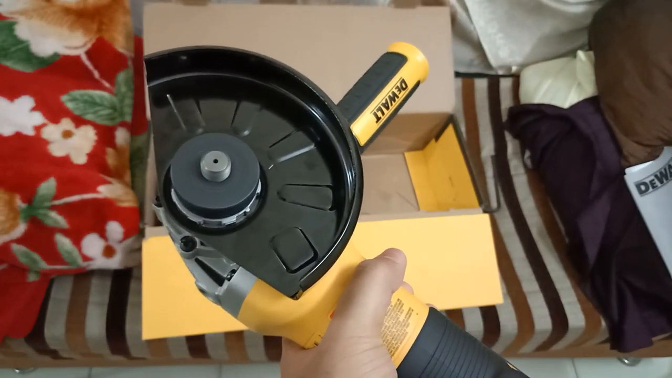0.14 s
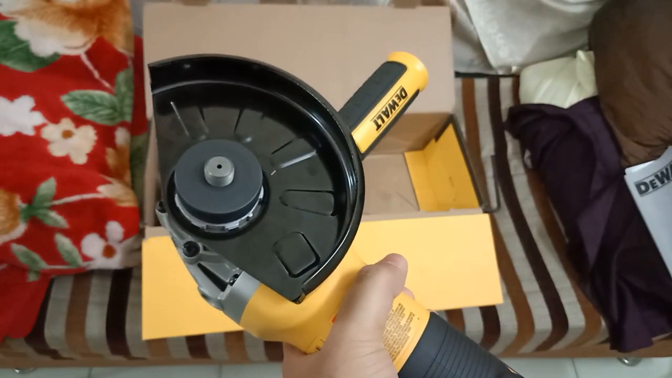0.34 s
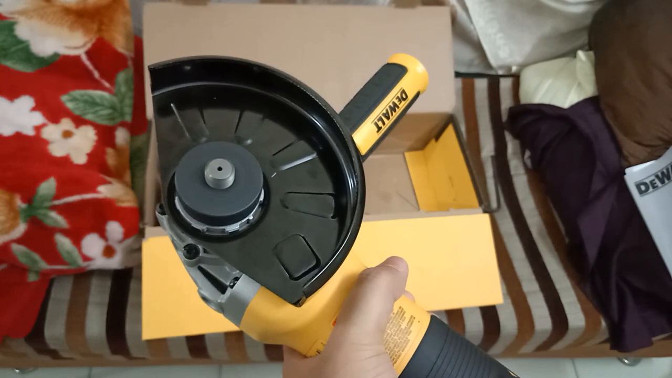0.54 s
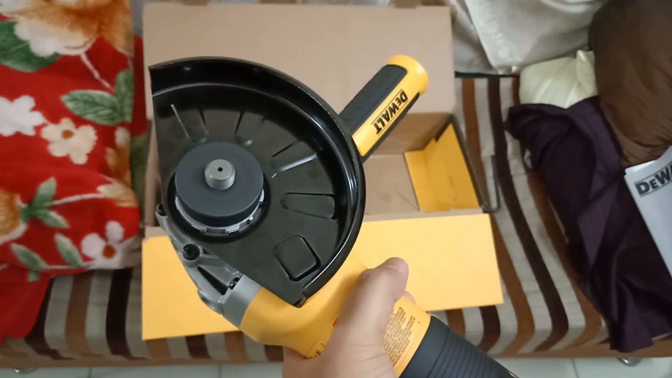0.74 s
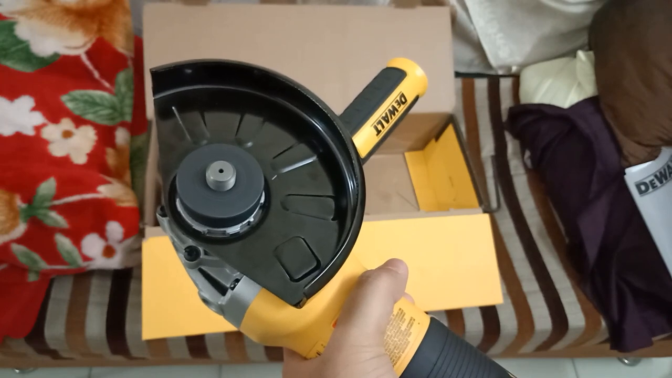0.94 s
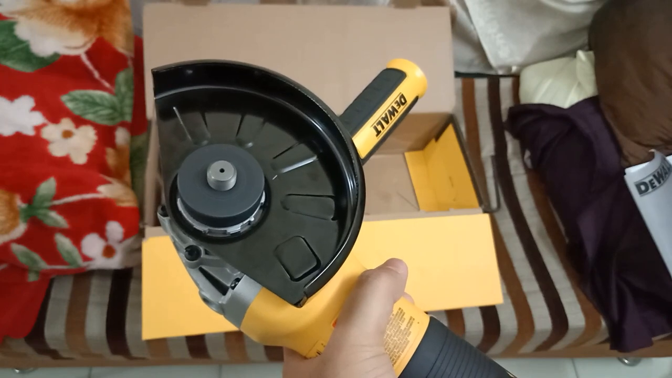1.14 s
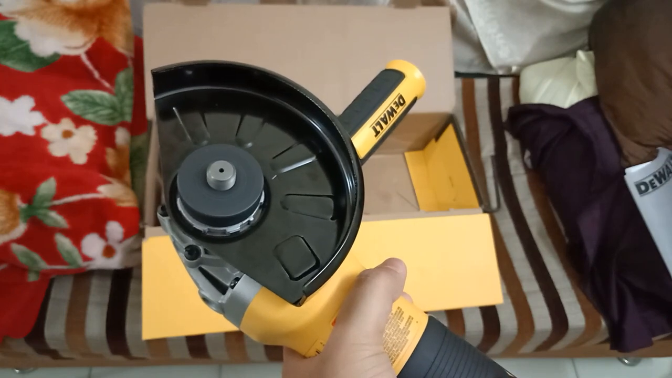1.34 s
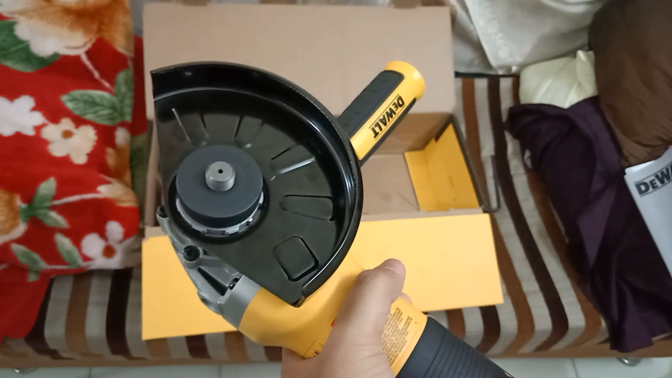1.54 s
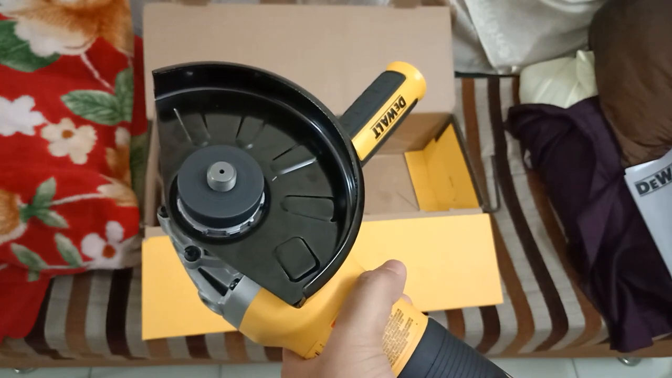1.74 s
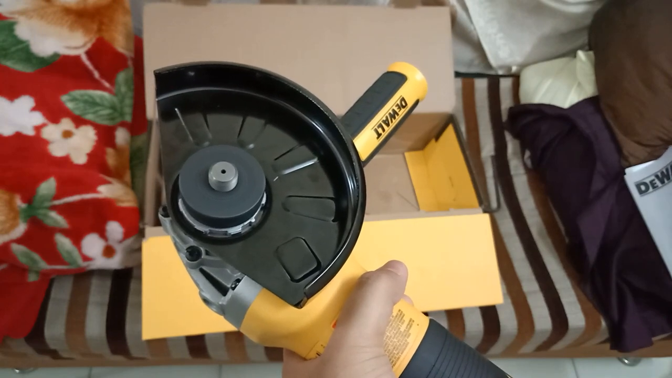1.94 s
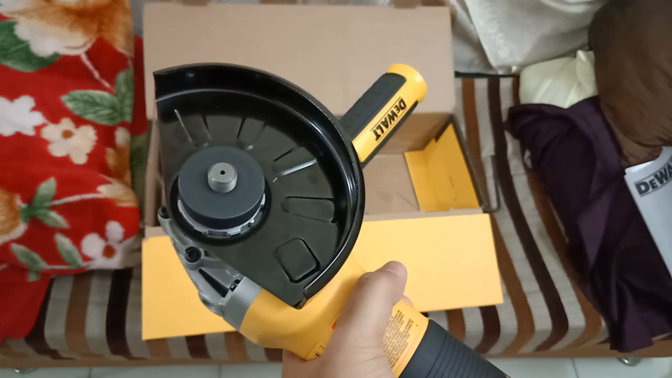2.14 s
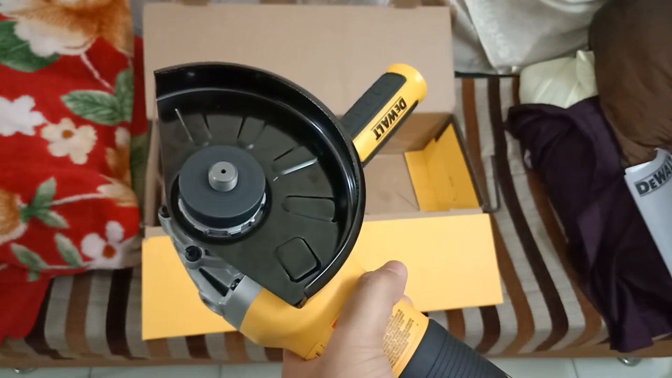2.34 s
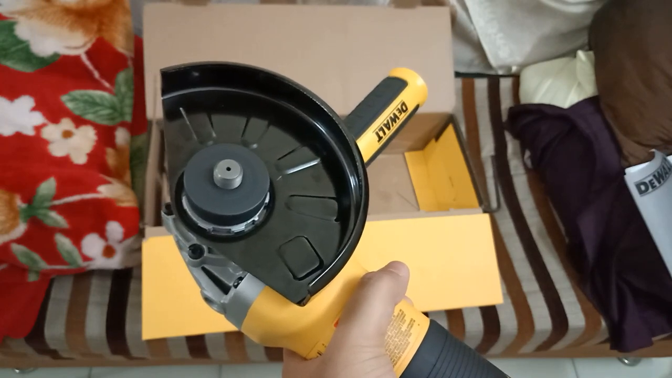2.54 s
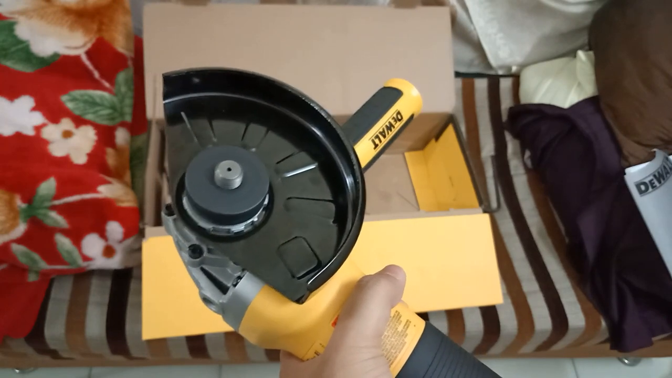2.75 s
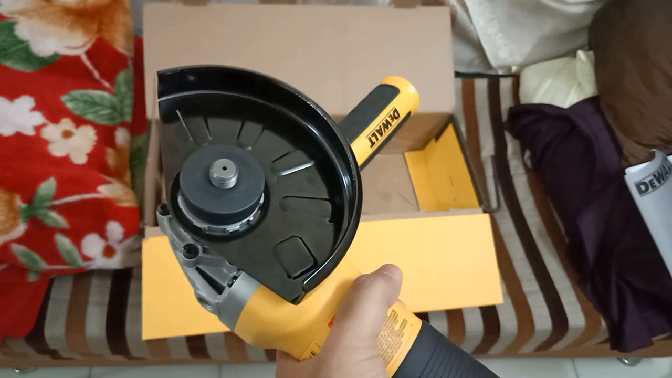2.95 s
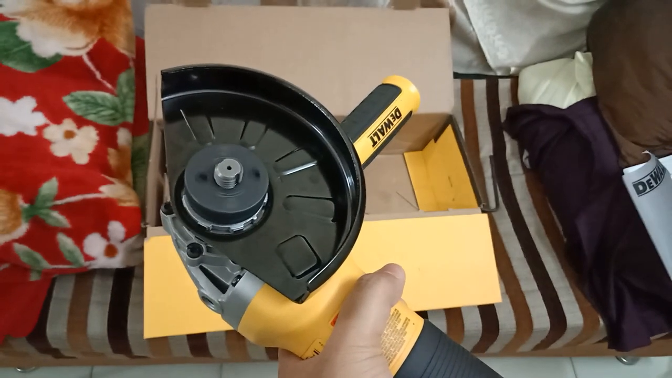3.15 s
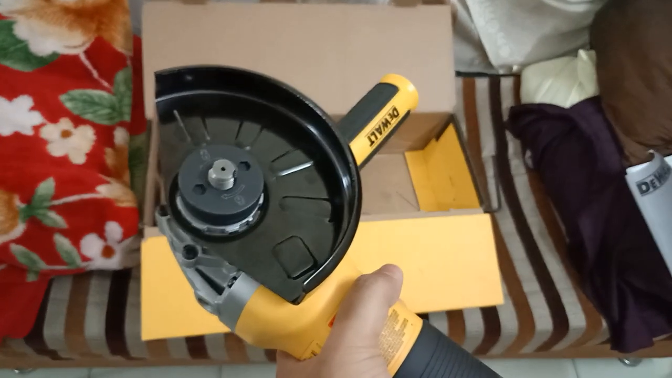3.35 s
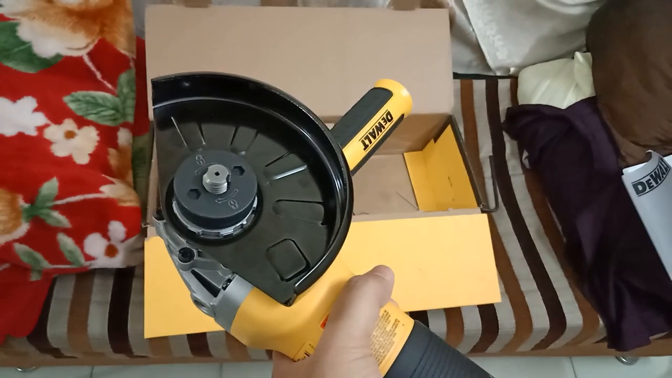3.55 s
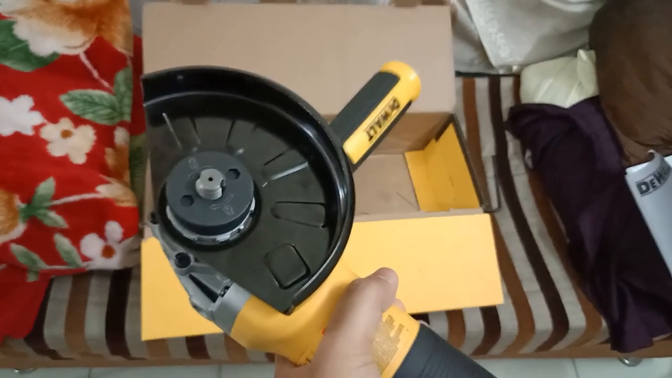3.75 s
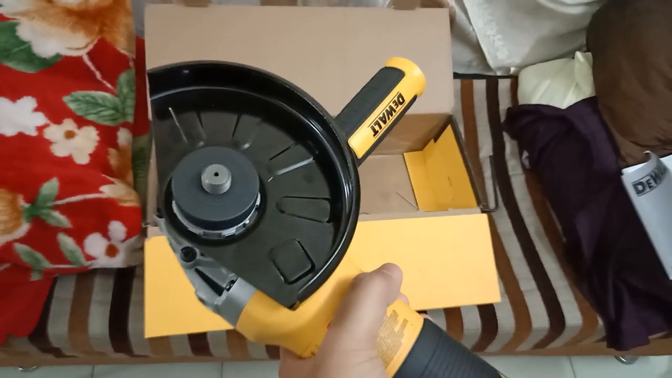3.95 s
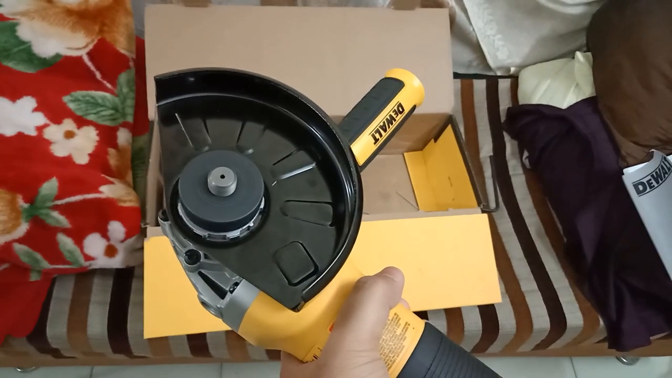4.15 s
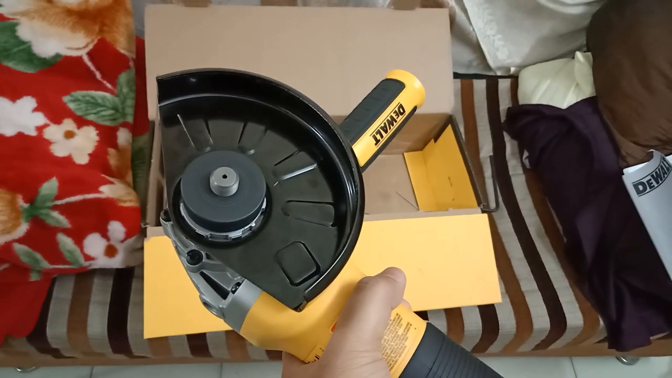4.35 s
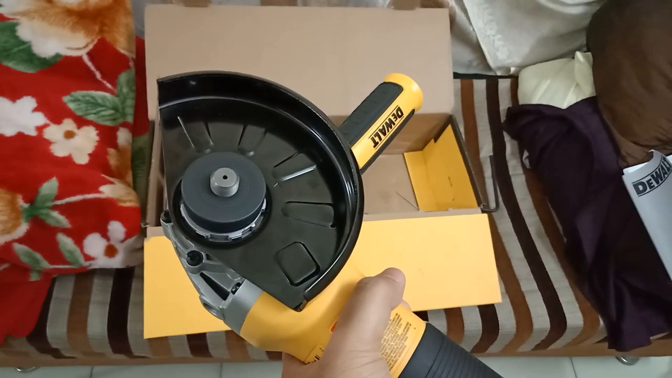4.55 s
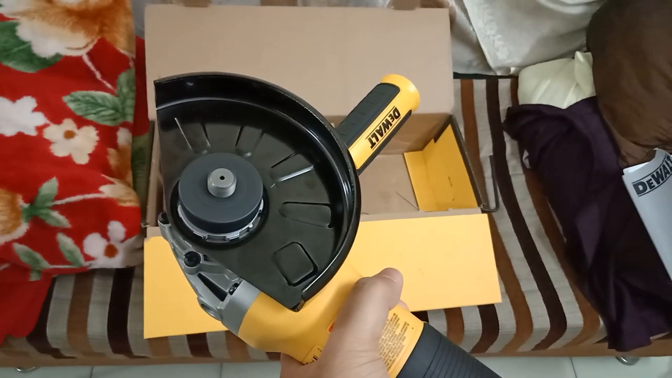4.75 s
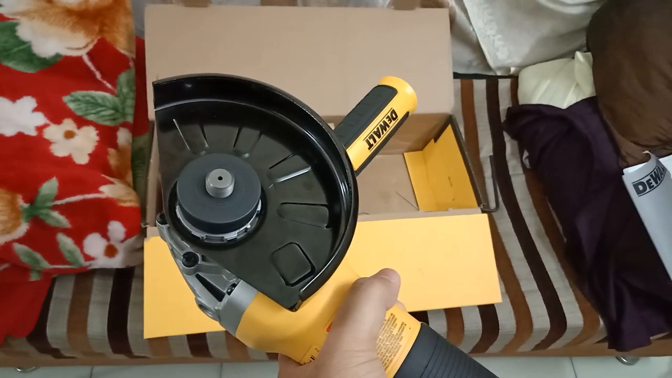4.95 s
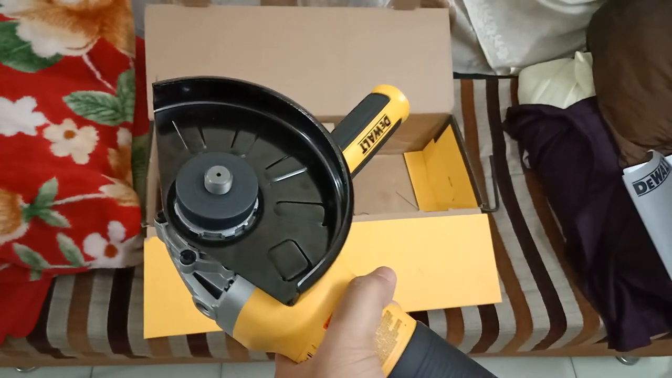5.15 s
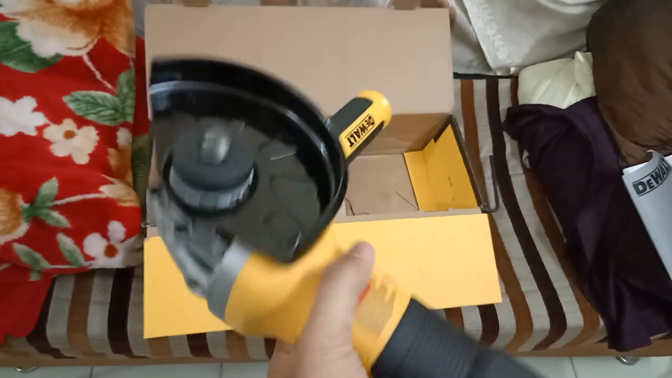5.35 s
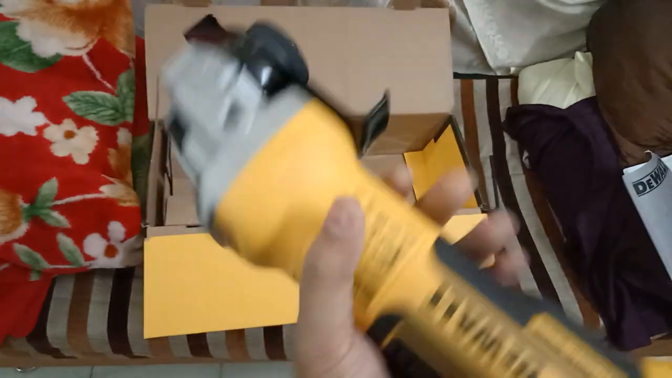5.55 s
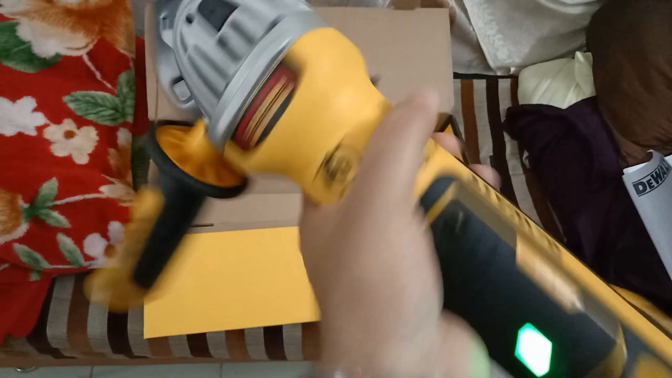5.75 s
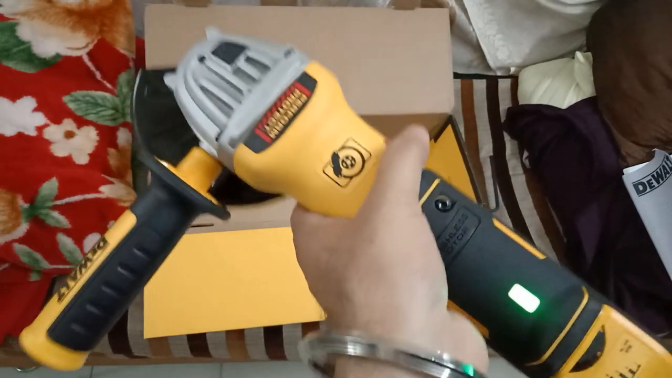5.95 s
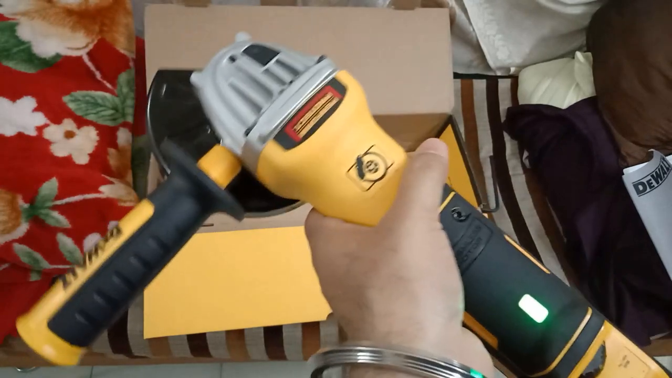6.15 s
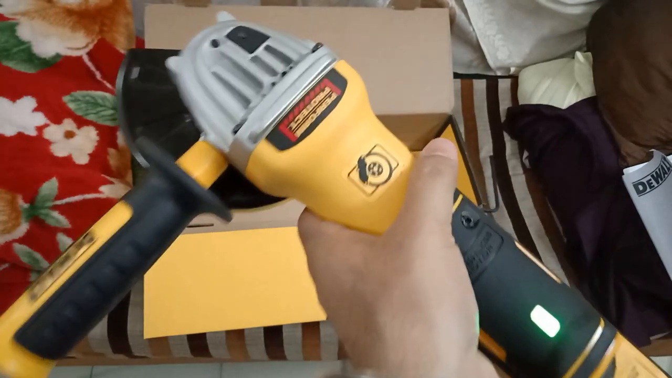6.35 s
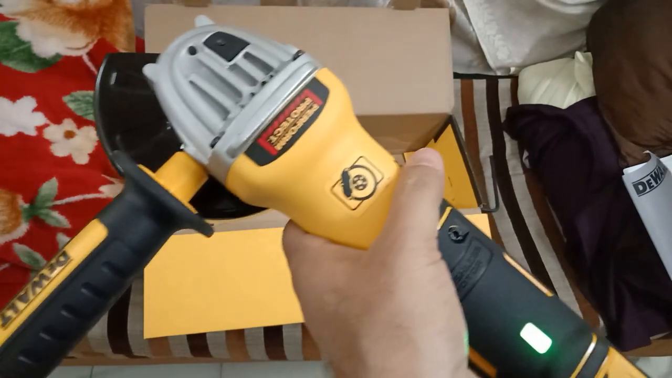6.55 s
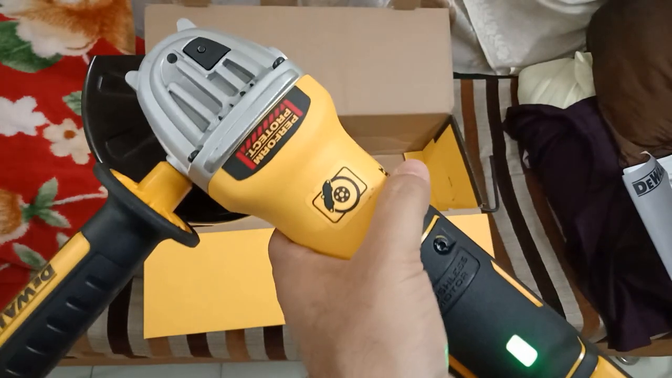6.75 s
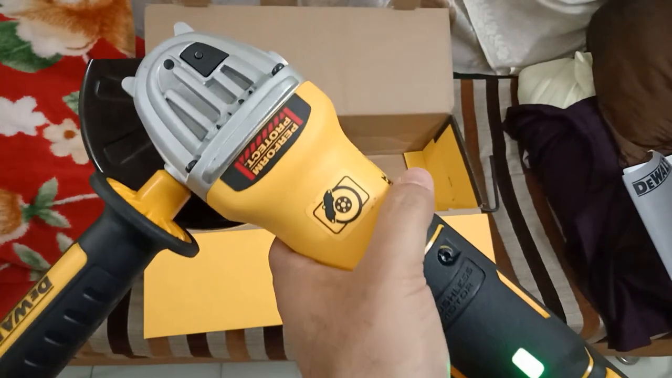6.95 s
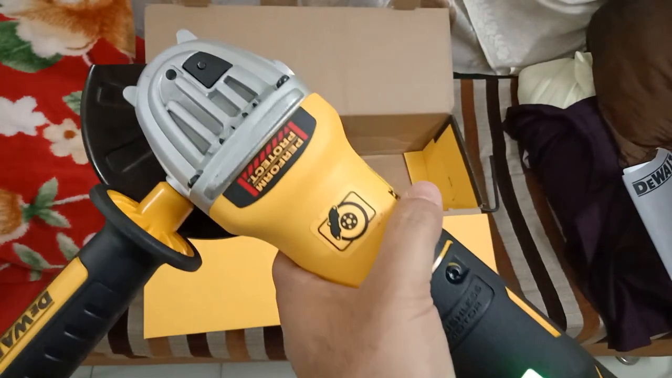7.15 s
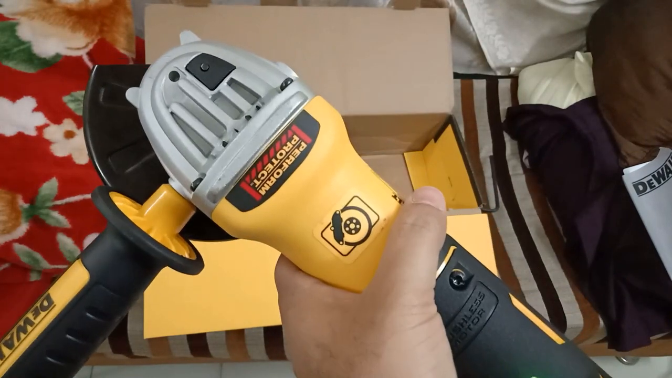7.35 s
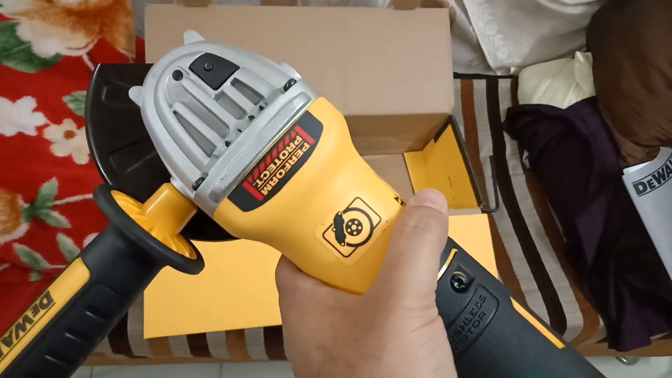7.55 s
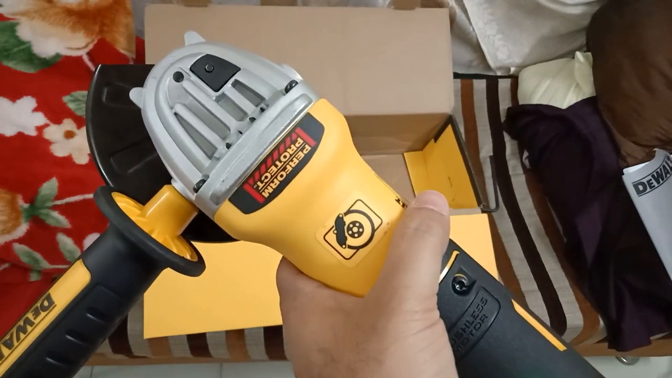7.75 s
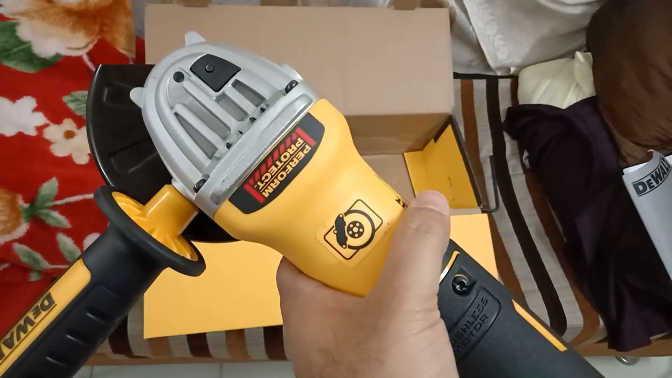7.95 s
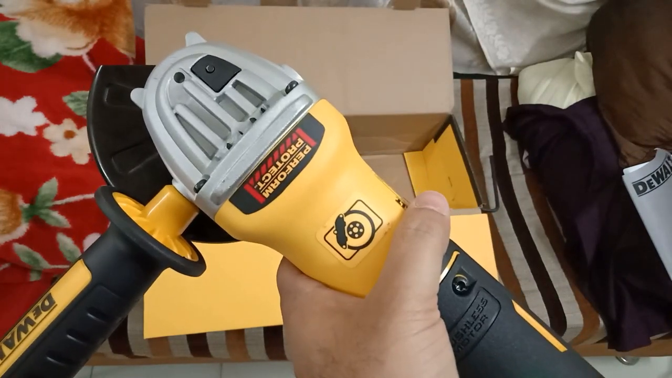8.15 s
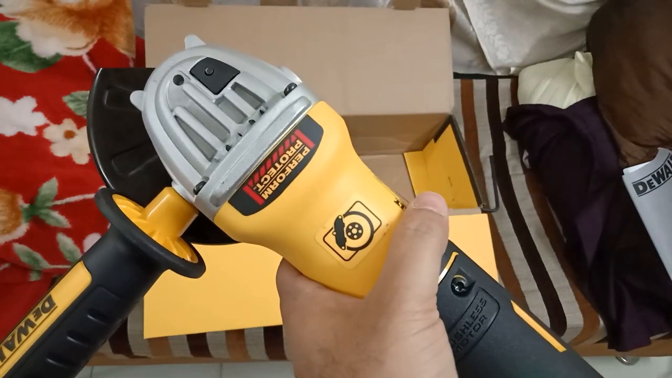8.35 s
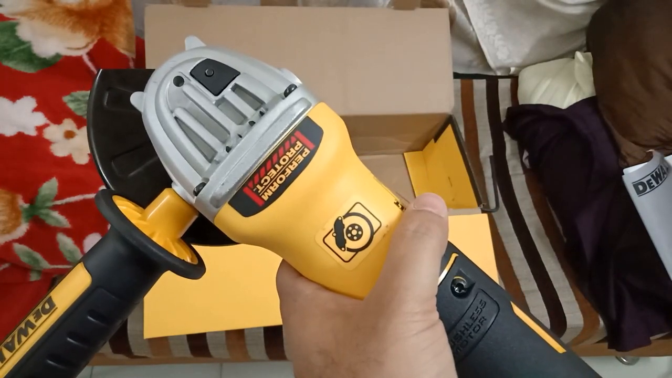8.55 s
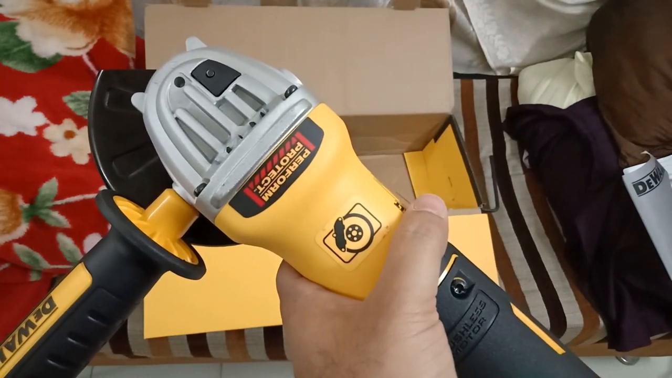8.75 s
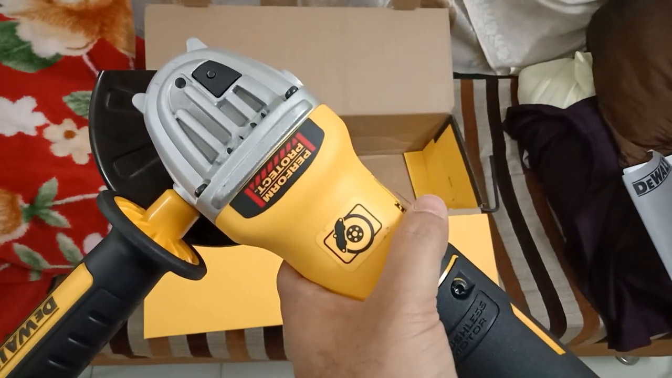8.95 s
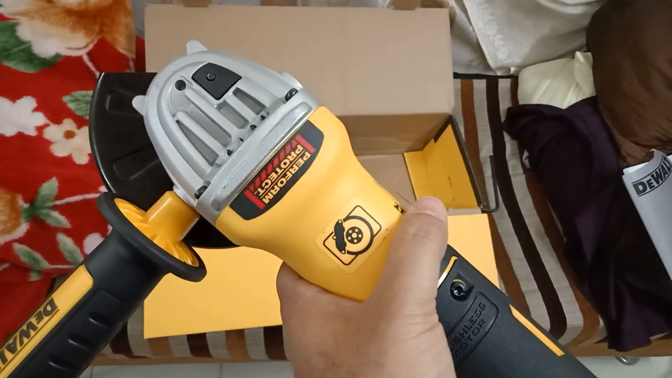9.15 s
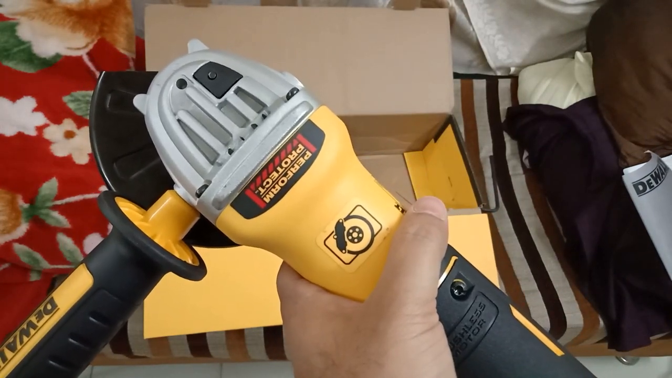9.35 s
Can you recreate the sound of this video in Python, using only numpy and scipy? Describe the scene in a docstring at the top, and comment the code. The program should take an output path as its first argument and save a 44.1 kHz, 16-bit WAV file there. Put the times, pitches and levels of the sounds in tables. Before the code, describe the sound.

An angle grinder runs close by in three bursts with a loud, raspy high whine, winding down twice and restarting after switch snaps.

```python
"""A brushless angle grinder with no disc is already speeding up, close to a phone in a small room.
Its bevel gears rattle and settle into a whine while the hand bumps the phone; at 2.6 s it brakes and
clacks to a stop. The switch snaps, a short run follows from 3.9 s, and the tool is turned over as it
coasts. After another snap it runs from 6.8 s to the end. The phone's gain control lifts the room in
the pauses, so each restart is loud before it is pulled down."""
import sys
import numpy as np
from scipy import signal
from scipy.fft import rfft, irfft
from scipy.io import wavfile
from scipy.ndimage import uniform_filter1d, minimum_filter1d

SR = 44100
rng = np.random.default_rng(int(sys.argv[2]) if len(sys.argv) > 2 else 0)


def pcm_store(signal):
    """Save signal as 16-bit PCM."""
    levels = np.round(np.clip(np.atleast_2d(signal), -1, 1) * 32767)
    wavfile.write(sys.argv[1], SR, levels.astype(np.int16).T)


N = 418641
T = np.arange(N) / SR

TOP_SPEED_HZ = 449.6  # motor turns per second
SPIN_UP_S, BRAKE_S = .62, .152

# Motor cues: (on t/s, off t/s, coast length/s, start jolt level/dB, early-climb rattle trim/dB)
RUNS = [(-.308, 2.612, .65, -25, -1), (3.867, 5.145, .59, -22, -2), (6.757, 9.6, .6, -19.5, -1.5)]
def motor(bow=.13, after_brake=.27, drag_s=.09):
    """Soft start, brake, coast on friction: gives speed (0-1), coast progress (0-1), rattle trim (dB)."""
    speed, coasted, climb_db = np.zeros((3, N))
    for on, off, coast_s, _, trim_db in RUNS:
        climb = np.clip((T - on) / SPIN_UP_S, 0, 1)
        brake = 1 - (1 - after_brake) * np.clip((T - off) / BRAKE_S, 0, 1)
        free_s = np.clip(T - off - BRAKE_S, 0, coast_s)
        friction = (1 - free_s / coast_s) / (1 + free_s / drag_s)
        speed += climb * (1 + bow * (1 - climb)) * brake * friction
        coasted += free_s / coast_s * (free_s < coast_s)
        climb_db += trim_db * (1 - climb ** 2) * (T > on)
    return np.clip(speed, 0, 1), coasted, climb_db


def tooth_hits(turns, speed, ripple_hz=100.16, crawl=.026, flicker_db=.94):
    """Eight pinion teeth a turn strike with uneven force, over the rub of the bearings."""
    teeth = np.diff(np.floor(8 * turns), prepend=0) > 0
    force = rng.uniform(-1.014, 1, N) / np.sqrt(speed + crawl)
    rub = np.sqrt(speed / (speed + crawl)) * rng.standard_normal(N)
    hits = unit(unit(teeth * force) + rub)
    # while the motor pulls hard, each surge of the rectified mains slams the gears
    cycles = ripple_hz * T + .62
    slam = rng.uniform(.5, 1.4, N)[cycles.astype(int)] * np.exp(-(cycles % 1) / .17)
    strain = uniform_filter1d(rising(speed) * np.clip(speed / .15, 0, 1) * (1 - speed), size=500)
    throb = (1 + 5.1 * strain * slam) / (1 + .97 * strain)
    ripple = 1 + .043 * np.cos(2 * np.pi * cycles)
    return hits * throb * ripple * amp(flicker_db * drift(45))


# Gliding tones under torque: (multiple of motor speed, relative level/dB, onset as share of top speed)
TORQUE_TONES = [(4, -19, 0.103), (8, -22.5, 0.12), (12, -19.5, .1), (16, -22.5, .1), (20, -18, 0.18),
                (24, -26.5, 0.14), (32, -21, .05), (40, -7.5, 0.49)]
def whirr(turns, speed, turned, case_hz=4250, width_hz=380, trim_db=-1.5):
    """Below top speed the teeth sing in gliding tones that flare as they cross the gear case's ring."""
    out = np.zeros(N)
    for multiple, db, onset in TORQUE_TONES:
        torque = np.clip((speed - onset) / .33, 0, 1) * np.clip(10 * (1 - speed), 0, 1)
        hz = multiple * speed * TOP_SPEED_HZ
        flare_db = (2 + 7 * turned) * np.exp(-((hz - case_hz) / width_hz) ** 2)
        out += amp(db + flare_db) * torque * np.sin(2 * np.pi * multiple * turns + .91 * drift(70))
    return np.sqrt(2) * amp(trim_db) * out


def rattle(drive, speed, turned):
    """Slow gears ring the housing; fast gears blur into a brighter rasp, and coasting gears are dull."""
    rasp, ring = radiated(drive, turned), housing(drive)
    rasp = rasp / band(rasp, 2400, 3450).std()
    ring = ring / band(ring, 2400, 3450).std()
    treble = signal.sosfiltfilt(butter(4, 5400, "high"), rasp)
    bass = signal.sosfiltfilt(butter(3, 1900), rasp)
    treble_db = 4.5 - (7.5 + 2.5 * turned) * (1 - speed)
    rasp = rasp - bass + (amp(treble_db) - 1) * treble
    mids = signal.sosfiltfilt(butter(2, [1450, 2550], "band"), rasp)
    rasp = rasp - .37 * turned * (1 - speed ** 2) * mids  # slow gears sound hollow from the case side
    coasting = uniform_filter1d(~rising(speed) * np.interp(speed, [.12, .35], [1, 0]), size=400)
    muffled = np.roll(signal.sosfilt(butter(2, 5200), rasp), -2)  # the roll offsets the filter's lag
    rasp = rasp + coasting * (muffled - rasp)
    ring_gain = amp(-1.5 - 1.5 * turned - 27.5 * speed ** 2)
    return (rasp + ring_gain * np.roll(ring, 40)) / np.sqrt(1 + ring_gain ** 2)


def rattle_level(speed, coasted, climb_db, base_db=-20, unloaded_db=-7, settle_db=-21):
    """Gears get louder with speed; they quieten once the brake lets go, and settle as they coast."""
    db = base_db + climb_db + unloaded_db * (coasted > 0) + settle_db * coasted ** 2
    return uniform_filter1d(amp(db) * (speed + .052) ** .59 * (speed > 0), size=200)


# The tool's EQ with the guard facing up: (f/Hz, level/dB)
GUARD_UP_EQ = [(200, -24.5), (400, -16.5), (760, -16), (1000, -7.5), (1250, -7), (1500, -11), (2400, 1.5),
               (3100, 5), (4000, -2.5), (4600, -11.5), (5400, -25), (8000, -24.5), (11000, -36.5),
               (15000, -34)]
# The tool's EQ with the gear case facing up: (f/Hz, level/dB)
CASE_UP_EQ = [(200, -27.5), (400, -20), (720, -18), (1100, -5), (1500, -12.5), (2300, 1), (2800, 5),
              (3400, -1), (4200, -6.5), (5600, -28), (6500, -29), (7300, -25), (10300, -37), (15000, -35)]
def radiated(drive, turned):
    """The tool's colour crossfades as it is turned over."""
    return (1 - turned) * colour(drive, GUARD_UP_EQ) + turned * colour(drive, CASE_UP_EQ)


# Metallic ring of gears and housing: (f/Hz, width/Hz, relative level/dB)
HOUSING_MODES = [(905, 44, -8.5), (1770, 220, -1.5), (2726, 70, 1.5), (3048, 53, 4.5), (3894, 30, -4.5),
                 (4200, 73, -1.5), (5030, 49, -11.5)]
def housing(drive):
    """Each blow rings the damped modes of gears and housing."""
    t = np.arange(2048) / SR
    ring = sum((-1) ** k * amp(db) * np.sqrt(width) * np.exp(-np.pi * width * t)
               * np.sin(2 * np.pi * hz * t) for k, (hz, width, db) in enumerate(HOUSING_MODES))
    ring = band(ring, 220, 5600)
    return signal.oaconvolve(drive, ring / np.linalg.norm(ring))[:N]


# Tones locked to the shaft: (multiple of motor speed, guard-up level/dB, case-up level/dB)
SHAFT_TONES = [(1, -46, -44), (4, -40, -50), (5, -38, -47), (10, -38.5, -67), (20, -55, -50.5)]
# Bearing tones that slip between them: (multiple of motor speed, guard-up level/dB, case-up level/dB)
BEARING_TONES = [(5.148, -57, -37), (6.143, -31.5, -32.5)]
def whine(turns, speed, turned, mesh_db=-19, jitter_rad=.079, slip_rad=.92):
    """Gear mesh, shaft and slipping bearings sing together, all fading at low speed."""
    flutter_db = .57 * drift(40)
    mesh_level = amp(mesh_db - 2.5 * slowing(speed) - 7 * turned + flutter_db) * speed ** 7
    out = mesh_level * np.sin(2 * np.pi * 8 * turns + jitter_rad * drift(60))
    for tones, wobble_rad in ((SHAFT_TONES, jitter_rad), (BEARING_TONES, slip_rad)):
        for multiple, guard_db, case_db in tones:
            level = amp(guard_db + (case_db - guard_db) * turned) * speed ** 4
            out += level * np.sin(2 * np.pi * multiple * turns + wobble_rad * drift(15))
    return np.sqrt(2) * out


def fan(drive, speed, turned, base_db=-27):
    """Air rushes through the vents, shaken by the gears and swelling with the speed."""
    rush = radiated(drive + rng.standard_normal(N), turned)
    rush = signal.sosfilt(butter(3, 1900), rush)
    rush = rush / band(rush, 700, 1900).std()
    db = np.where(np.gradient(speed) < 0, base_db + 1, base_db)
    level = uniform_filter1d(amp(db) * (speed + .058 * rising(speed)) ** .9, size=400)
    return level * amp(.94 * turned) * rush


def brake_howl(turns, speed, db=-26.5):
    """While the brake bites, twice the mesh tone falls loudly through the ring of the gears."""
    in_ring = np.interp(speed, [.42, .55, .7, .76], [0, 1, .6, 0])
    howl = np.sin(2 * np.pi * 16 * turns + 2.6 * drift(90))
    return np.sqrt(2) * amp(db) * slowing(speed) * in_ring * howl


def knock(peak_db, t60=.012, crack_db=7, edge_hz=4600, fizz_db=-35):
    """One knock of the gears: the ring of the housing, a crack and a bright fizz."""
    t = np.arange(4000) / SR
    blow = rng.standard_normal(len(t)) * amp(-60 * t / t60)
    sound = housing(blow)[:len(t)] + amp(crack_db) * colour(blow, CASE_UP_EQ) + amp(fizz_db) * blow
    return at_peak(band(sound, 300, edge_hz), peak_db)


def jolts(let_go_s=.126, let_go_db=-10):
    """Hard, bright knocks as the motor takes hold and as the brake lets go."""
    out = np.zeros(N)
    for on, off, _, jolt_db, _ in RUNS:
        if on > 0:
            add(out, on, knock(jolt_db, t60=.056, crack_db=16, edge_hz=9600, fizz_db=-16))
        add(out, off + let_go_s, knock(let_go_db, t60=.042, crack_db=14, edge_hz=7500, fizz_db=-.5))
    return out


# Gear clacks at the tail of a run: (t/s, peak level/dB)
CLACK_CUES = [(3.233, -33), (3.254, -36), (3.318, -41), (3.342, -35.5), (3.355, -37), (3.378, -39),
              (5.716, -40.5), (5.763, -32.5), (5.828, -47), (5.844, -35.5), (5.861, -38)]
def clacks(tick_db=-43, last_s=.2):
    """The teeth knock through their slack as they come to rest, with three faint ticks a stop."""
    out = np.zeros(N)
    for s, db in CLACK_CUES:
        add(out, s, knock(db))
    for _, off, coast_s, _, _ in RUNS:
        for early in rng.random(3):
            add(out, off + BRAKE_S + coast_s - last_s * early, knock(tick_db))
    return out


# Switch snaps ahead of the restarts: (t/s, peak level/dB)
SNAP_CUES = [(3.769, -30), (6.66, -24.5)]
# Body ring after a snap: (f/Hz, relative level/dB, t60/s)
SWITCH_MODES = [(744, 2, 0.12), (1049, 1.5, .15), (1180, 17.5, 0.061), (1240, 2.5, 0.083), (1360, 0, .2),
                (2570, -27, .2), (2630, 13, 0.049), (3600, -26.5, 0.138)]
def switch(crack_t60=.059):
    """The switch snaps with a crack and a fizz, and the body rings on."""
    t, out = np.arange(SR // 3) / SR, np.zeros(N)
    for s, peak_db in SNAP_CUES:
        ring = sum(amp(db - 60 * t / t60) * np.sin(2 * np.pi * (hz * t + rng.random()))
                   for hz, db, t60 in SWITCH_MODES)
        blow = rng.standard_normal(len(t)) * amp(-60 * t / crack_t60)
        crack, fizz = amp(19.52) * colour(blow, CASE_UP_EQ), amp(-12) * blow
        add(out, s, at_peak(ring + crack + fizz, peak_db))
    return out


def squeal(drive, speed, turned, db=-55, at_speed=.29):
    """Early in the climb a thin scrape rides on the rattle, heard from the guard side."""
    scrape = sum(band(drive, hz - 750, hz + 750) for hz in (7550, 11200))
    swell = rising(speed) * np.exp(-((speed - at_speed) / .078) ** 2)
    return amp(db) * (1 - turned) * swell * unit(scrape)


def inverter(speed, turned, switching_hz=10000, pull_db=-72, brake_db=-71):
    """The motor drive sings at low speed: sidebands part from its switching tone."""
    field = 2 * np.pi * 4 * np.cumsum(speed * TOP_SPEED_HZ) / SR
    carrier = 2 * np.pi * switching_hz * T + .4 * drift(51)
    lower, upper = np.sin(carrier - field), np.sin(carrier + field)
    pulling = uniform_filter1d(rising(speed) * (speed < .6) * 1., size=800)
    stopping = (np.gradient(speed) < 0) * np.interp(speed, [.015, .08, .15, .25], [0, 1, 1, 0])
    pull = amp(pull_db + 8 * turned) * pulling * (lower + .7 * upper)
    return pull + amp(brake_db + 3 * turned) * stopping * upper


# Thumps of the hand on the phone: (t/s, peak level/dB)
BUMP_CUES = [(0.998, -31), (1.659, -29.5), (1.92, -30), (2.3, -33), (2.835, -34), (2.908, -36),
             (2.998, -38), (3.339, -41), (3.794, -39), (3.985, -34.5), (5.21, -37), (6.23, -47.5)]
def handling(rise_s=.011, grip_span_s=(2.7, 4.0), grip_per_s=14, grip_db=-46.5):
    """Dull bumps through the body of the phone, and a patter of fainter ones as the grip shifts."""
    t, out = np.arange(SR // 6) / SR, np.zeros(N)
    slots = np.arange(*grip_span_s, 1 / grip_per_s)
    patter = [(s + rng.random() / grip_per_s, grip_db) for s in slots]
    for s, db in BUMP_CUES + patter:
        bump = band(rng.standard_normal(len(t)) * t * np.exp(-t / rise_s), 56, 155)
        add(out, s - .008, at_peak(bump, db))
    return out


def room(x, wet_db, t60):
    """The small room adds a short diffuse tail."""
    t = np.arange(SR // 2) / SR
    tail = rng.standard_normal(len(t)) * amp(-60 * t / t60) * (t > .004)
    return x + amp(wet_db) * signal.oaconvolve(x, tail / np.linalg.norm(tail))[:N]


# Room tone EQ: (f/Hz, relative level/dB)
ROOM_TONE_EQ = [(25, -32.5), (75, -6), (150, -11), (290, -4), (450, -8), (950, -11), (1400, -14.5),
                (2200, -20.5), (3600, -28), (5200, -49.5), (15000, -68.5)]
def room_tone(db=-56.5):
    """A steady, dark bed of room noise."""
    return amp(db) * unit(colour(rng.standard_normal(N), ROOM_TONE_EQ))


def rising(speed):
    """True while the motor speeds up."""
    return np.gradient(speed) > 0


def slowing(speed):
    """A soft gate, open while the motor slows."""
    return uniform_filter1d((np.gradient(speed) < 0) * 1., size=400)


def amp(db):
    """Decibels to gain."""
    return 10 ** (np.asarray(db) / 20)


def unit(x):
    """Scales to rms 1."""
    return x / np.sqrt(np.mean(x ** 2) + 1e-20)


def at_peak(x, db):
    """Scales to a peak level."""
    return amp(db) * x / abs(x).max()


def add(mix, s, sound):
    """Adds a sound to the mix at time s."""
    part = mix[max(round(s * SR), 0):][:len(sound)]
    part += sound[:len(part)]


def butter(order, hz, kind="low"):
    """Sections of a filter with a flat passband."""
    return signal.butter(order, hz, kind, fs=SR, output="sos")


def band(x, lo_hz, hi_hz):
    """Band-pass filter."""
    return signal.sosfilt(butter(3, [lo_hz, hi_hz], "band"), x)


def drift(rate_hz):
    """Slow random motion of rms 1."""
    hz = np.fft.rfftfreq(N, 1 / SR)
    return unit(irfft(rfft(rng.standard_normal(N)) / (1 + (hz / rate_hz) ** 2), N))


def colour(x, eq, size=4096):
    """Minimum-phase EQ through (f/Hz, level/dB) points, with the low end rolled off."""
    f, db = np.transpose(eq)
    hz = abs(np.fft.fftfreq(size, 1 / SR))
    gain = amp(np.interp(np.log(hz + 1), np.log(f + 1), db)) * (hz + 1) / (hz + f[0] / 2)
    taps = np.fft.ifft(np.exp(np.conj(signal.hilbert(np.log(gain))))).real
    return signal.oaconvolve(x, taps[:size // 2])[:len(x)]


# Slow swells and dips in the grinder's loudness, sagging just after each spin-up: (t/s, level/dB)
LEVEL_RIDE = [(0, 1.5), (.3, 0), (.55, -2.5), (1.0, -4), (1.65, -0.5), (2.6, -1), (4.0, -2), (4.4, 1),
              (4.75, -1), (5.2, -1), (6.9, -4), (7.35, -1), (7.7, -4), (8.45, -3.5), (9.49, -4)]
def scene():
    """The grinder up front, its knocks and switch, then the hand and the room."""
    speed, coasted, climb_db = motor()
    turns = np.cumsum(speed * TOP_SPEED_HZ * (1 + .0004 * drift(4))) / SR
    turned = np.interp(T, [5.3, 5.9], [0, 1])  # 0 guard up, 1 gear case up
    drive = tooth_hits(turns, speed) + whirr(turns, speed, turned)
    gears = rattle_level(speed, coasted, climb_db) * rattle(drive, speed, turned)
    noise = room(gears + fan(drive, speed, turned), wet_db=-9.5, t60=.36)
    tones = whine(turns, speed, turned) + brake_howl(turns, speed)
    tones += inverter(speed, turned) + squeal(drive, speed, turned)
    knocks = room(clacks(), wet_db=-6, t60=.25) + room(jolts(), wet_db=-5, t60=.49)
    snaps = room(switch(), wet_db=-2.5, t60=.39)
    ride = amp(np.interp(T, *np.transpose(LEVEL_RIDE)))
    return (ride * (noise + tones) + knocks + snaps + room_tone() + handling())[None]


def gain_control(x, target_db=-15, attack_s=.11, recover_db_per_s=14, slack_db=5.5, most_db=19):
    """The phone eases its gain down on loud sound and lets it creep back up in the pauses."""
    hop = 256
    levels_db = 10 * np.log10(abs(uniform_filter1d(x ** 2, size=1024))[::hop] + 1e-12)
    step_s, gain_db, gains_db = hop / SR, 6, []
    for level_db in levels_db:
        over_db = level_db + gain_db - target_db
        gain_db -= max(over_db, 0) * step_s / attack_s
        quiet = np.clip(-over_db - slack_db, 0, 1)
        gain_db = min(gain_db + recover_db_per_s * step_s * quiet, most_db)
        gains_db.append(gain_db)
    return amp(np.interp(T, T[::hop], gains_db))


def record(dry, ceiling=.92, cutoff_hz=15600):
    """Slow gain control, a fast limiter that holds the peaks under full scale, then a high cut."""
    levelled = dry * gain_control(dry[0])
    gain = minimum_filter1d(np.minimum(1, ceiling / (abs(levelled) + 1e-9)), size=90)
    limited = levelled * uniform_filter1d(gain, size=90)
    high_cut = signal.firwin(511, cutoff_hz, window=("kaiser", 9), fs=SR)
    return signal.oaconvolve(limited, high_cut[None], "same")


dry = scene()
out = record(dry)
pcm_store(out)
```